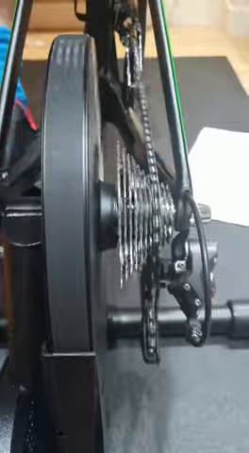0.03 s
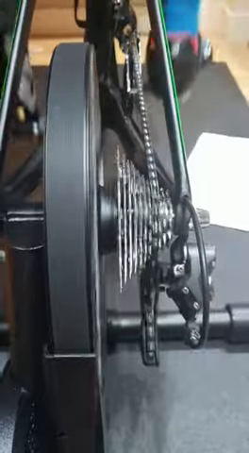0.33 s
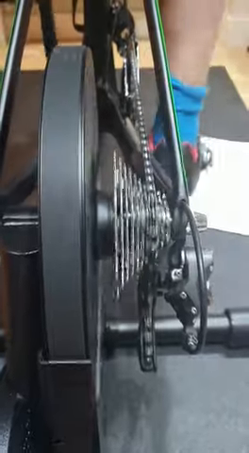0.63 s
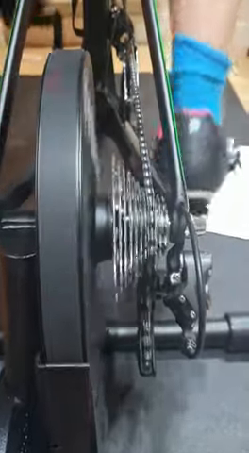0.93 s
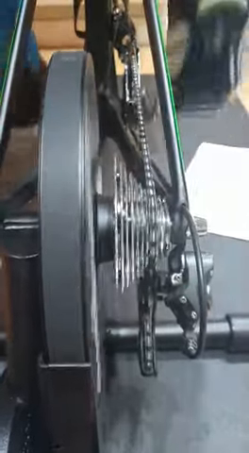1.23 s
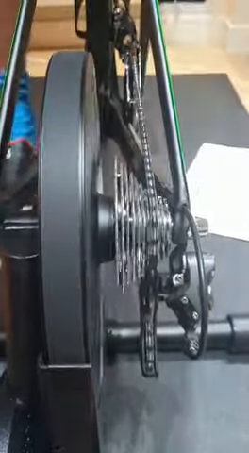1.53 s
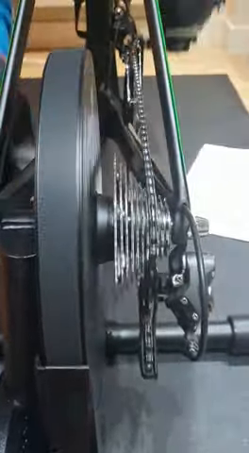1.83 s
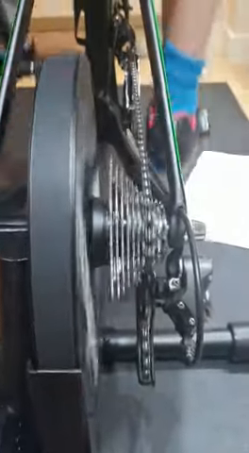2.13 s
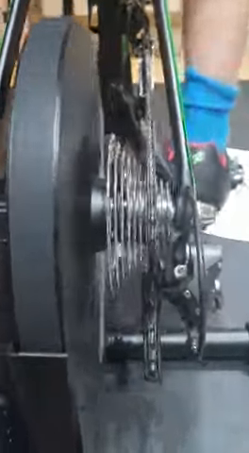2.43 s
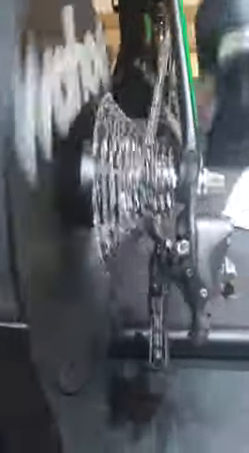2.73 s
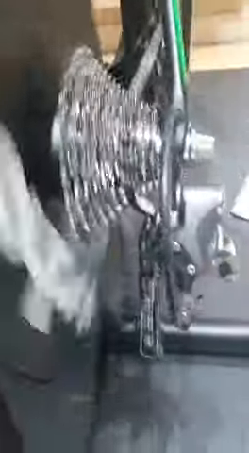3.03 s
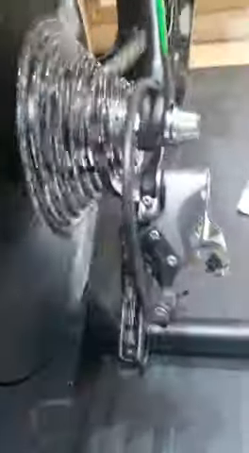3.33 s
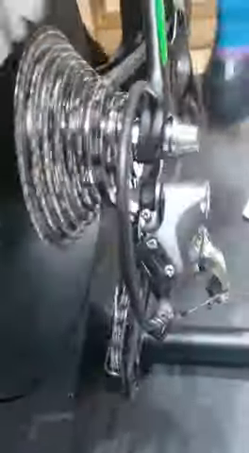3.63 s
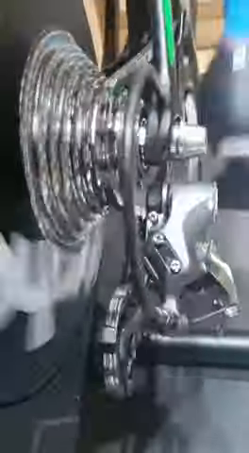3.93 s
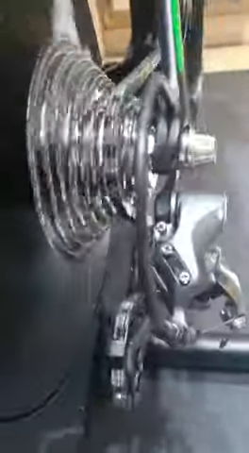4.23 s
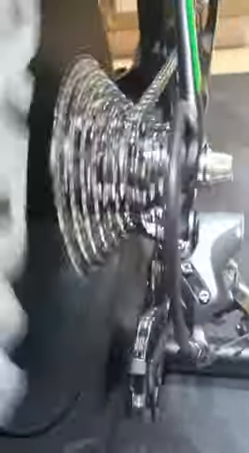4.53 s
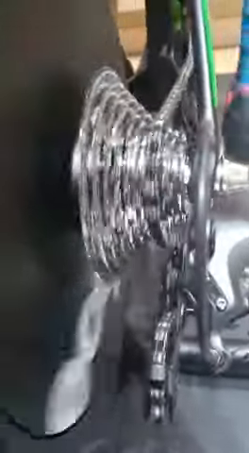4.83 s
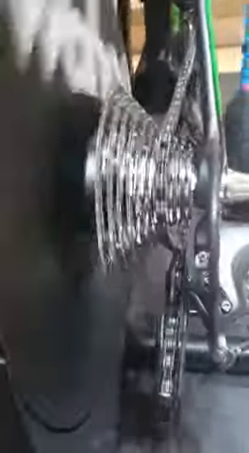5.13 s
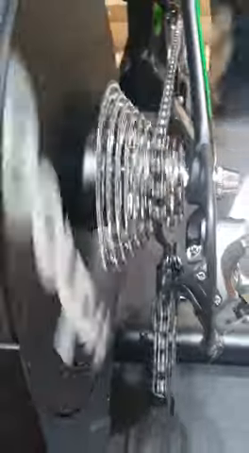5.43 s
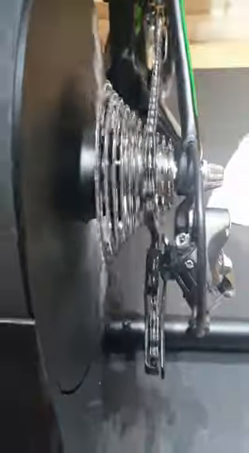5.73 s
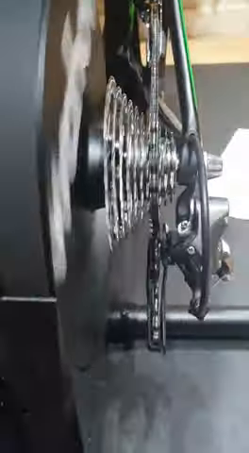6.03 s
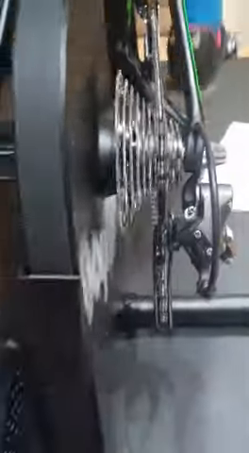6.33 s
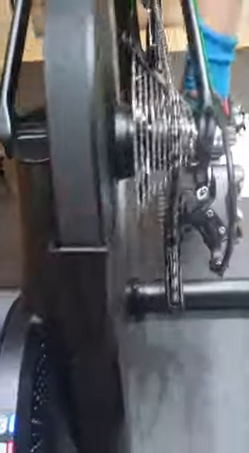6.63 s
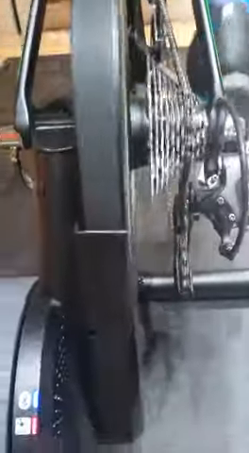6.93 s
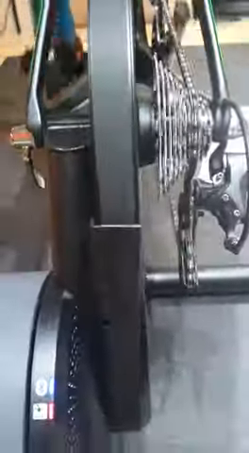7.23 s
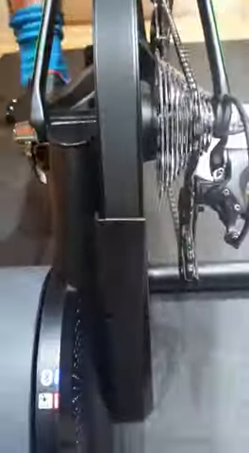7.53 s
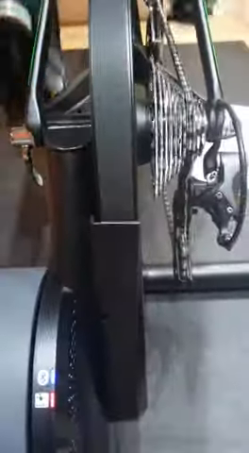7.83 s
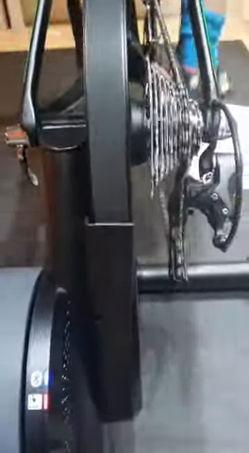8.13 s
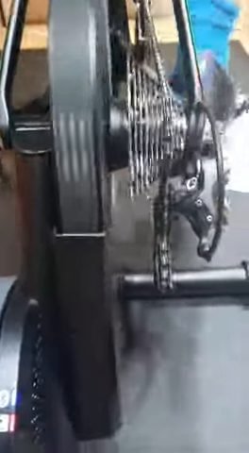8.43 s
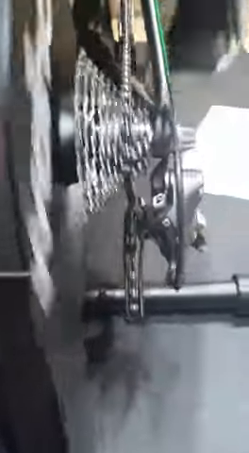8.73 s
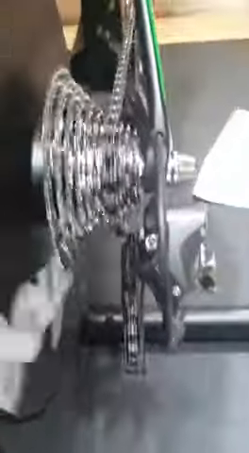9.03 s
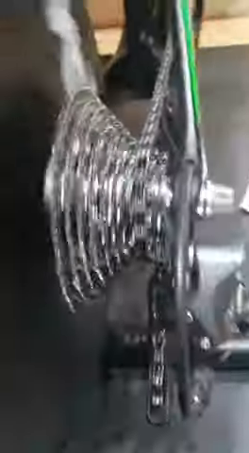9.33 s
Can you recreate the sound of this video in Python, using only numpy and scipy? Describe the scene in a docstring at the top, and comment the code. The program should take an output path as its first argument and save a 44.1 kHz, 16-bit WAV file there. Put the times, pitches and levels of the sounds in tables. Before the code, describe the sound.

A bicycle on an indoor trainer whirs and rumbles steadily, its chain rustling, with clicks and ringing clunks as the gears change.

```python
"""Changing gear on a bicycle trainer

A bicycle is pedalled on a direct-drive trainer in a small room, heard close to the cassette (the rear
sprockets). The flywheel drive whirs over a low rumble, the chain rustles and ticks, and each pedal
stroke rattles the frame. Gear changes make the chain click along the sprockets and drop onto them
with a clunk that rings in the room."""
import sys
import numpy as np
from scipy import signal
from scipy.fft import rfft, irfft, next_fast_len
from scipy.io import wavfile
from scipy.ndimage import map_coordinates

SR = 44100
rng = np.random.default_rng(int(sys.argv[2]) if len(sys.argv) > 2 else 0)


def to_wav(s):
    """Save 16-bit WAV."""
    ch = np.atleast_2d(s).T  # columns
    pcm = np.round(np.clip(ch, -1, 1) * 32767)  # PCM
    wavfile.write(sys.argv[1], SR, pcm.astype(np.int16))


N = 418068


def amp(db):
    """Turn decibels into a gain."""
    return 10 ** (np.asarray(db) / 20)


def unit(x):
    """Scale to an average power of 1."""
    return x / np.sqrt(np.mean(x ** 2) + 1e-20)


def along(points, hz):
    """Read between (frequency, value) points on a log axis."""
    f, v = np.transpose(points)
    return np.interp(np.log(hz + 1), np.log(f + 1), v)


def peaks(resonances, hz):
    """Gain of resonances given as (f/Hz, half-width/Hz, level/dB)."""
    gains = (amp(db) / (1 + ((hz - centre) / width) ** 2) for centre, width, db in resonances)
    return np.sqrt(sum(gain ** 2 for gain in gains))


def wobble(rate):
    """A smooth curve through `rate` random values a second."""
    return map_coordinates(rng.standard_normal(int(N * rate / SR) + 4), [np.arange(N) * rate / SR])


def add(track, s, sound):
    """Mix a stereo sound into the track at time s."""
    part = track[:, max(round(s * SR), 0):][:, :sound.shape[1]]
    part += sound[:, :part.shape[1]]


def colour(x, gain):
    """Filter by gain(hz), ringing only after a sound, never before it (minimum phase)."""
    n = x.shape[-1]
    m = 2 * next_fast_len(n // 2 + 4096)
    cepstrum = irfft(np.log(np.maximum(gain(np.fft.rfftfreq(m, 1 / SR)), 1e-6)))
    cepstrum[1:m // 2] *= 2
    cepstrum[m // 2 + 1:] = 0
    return irfft(rfft(x, m) * np.exp(rfft(cepstrum)), m)[..., :n]


def shaped(x, spectrum):
    """Filter by a spectrum without changing the power of white noise."""
    norm = np.sqrt(np.mean(amp(along(spectrum, np.linspace(0, SR / 2, SR // 10))) ** 2))
    return colour(x, lambda hz: amp(along(spectrum, hz)) / norm)


# how alike left and right sound: f/Hz, likeness (0 to 1)
LIKENESS = [(40, .65), (80, .75), (150, .93), (300, .5), (700, .25), (1500, .05), (5000, 0)]
def noise(size):
    """Stereo white noise: alike in the bass, unrelated in the treble."""
    m = next_fast_len(size)
    angle = np.arccos(np.clip(along(LIKENESS, np.fft.rfftfreq(m, 1 / SR)), -1, 1)) / 2
    mid, side = irfft(rfft(rng.standard_normal((2, m))) * [np.cos(angle), np.sin(angle)], m)
    return np.array([mid + side, mid - side])[:, :size]


def burst(t60):
    """A puff of noise with energy 1 that fades by 60 dB in t60 seconds."""
    t = np.arange(SR // 2) / SR
    return unit(noise(len(t)) * amp(-60 * t / t60)) / np.sqrt(len(t))


# how long the room rings: f/Hz, t60/s
ROOM_DECAY = [(80, 0.17), (400, 0.68), (1200, 0.59), (3000, 0.64), (6000, 0.49), (12000, 0.26)]
def room_tail():
    """The room's echo builds up quickly, then each frequency dies at its own speed."""
    size = SR // 2
    hz, t, spectra = signal.stft(noise(size), SR, nperseg=256)
    tail = signal.istft(spectra * amp(-60 * t / along(ROOM_DECAY, hz)[:, None]), SR)[1][:, :size]
    build_up = 1 - np.exp(-np.arange(size) / SR / 0.0027)
    return unit(tail * build_up) / np.sqrt(size)


def contact(t60, room_db):
    """One short tap followed by the room's echo."""
    return burst(t60) + amp(room_db) * room_tail()


def link_blows(rate_hz, scatter, spread_db):
    """Chain links hit teeth, uneven in time and strength."""
    slots = np.arange(int(N / SR * rate_hz))
    late, size = rng.standard_normal((len(slots), 2)).T
    at = np.clip((slots + scatter * late) / rate_hz * SR, 0, N - 1).astype(int)
    return np.bincount(at, amp(spread_db * np.clip(size, -2, 2)), N)


def struck(blows, answer):
    """Every blow sets off the same short sound."""
    return unit(signal.fftconvolve(blows[None], answer, axes=1)[:, :N])


# low drone of the stand and room: f/Hz, level/dB
HUM_TONES = [(62, -51), (90, -54), (100, -45), (113, -49)]
# tone of the shaking floor: f/Hz, level/dB
RUMBLE_SPECTRUM = [(15, -58), (25, -15), (35, -29), (44, -15), (54, 1.5), (70, -4.5), (102, 0.5), (114, -2),
                   (134, -6.5), (188, -9.5), (227, -21.5), (306, -19.5), (400, -31.5), (520, -47),
                   (880, -120)]
def stand(rumble_db):
    """The trainer shakes the floor, over a few slightly unsteady low tones."""
    t = np.arange(N) / SR
    hum = sum(amp(db) * np.sqrt(2) * np.sin(2 * np.pi * hz * t + .5 * wobble(2.48))
              for hz, db in HUM_TONES)
    return hum + amp(rumble_db - 4.0) * shaped(noise(N), RUMBLE_SPECTRUM)


# booms of the stand: t/s, relative level/dB, f/Hz, t60/s
STAND_JOLTS = [(2.531, -27, 93.5, 0.12), (2.986, -26.5, 192, 0.55), (3.042, -44, 188, .14),
               (3.346, -22, 90, 0.084), (3.82, -22.5, 82.5, 0.23), (3.864, -13, 114, 0.067),
               (3.932, -16, 98, 0.067), (4.899, -25, 81.6, 0.11), (5.135, -20, 183, 0.073),
               (6.1, -22, 108, 0.079), (8.06, -29, 180, 0.1), (9.265, -14.5, 83, 0.091)]
def thuds():
    """Each jolt rocks the stand in a soft, low, dying swing."""
    track, t = np.zeros((2, N)), np.arange(SR // 2) / SR
    onset = 1 - np.exp(-t / 0.0045)
    for s, db, hz, t60 in STAND_JOLTS:
        swing = amp(db + 1.0 - 60 * t / t60) * np.sin(2 * np.pi * hz * t) * onset
        add(track, s, np.array([swing, swing]))
    return track


# resonances of the flywheel drive: f/Hz, half-width/Hz, level/dB
WHIR_PEAKS = [(1337, 78, -7.5), (1389.6, 13, -1.5), (1418, 9.4, -1), (1456.4, 31, -1), (1544, 29, -14)]
def flywheel(whir_db):
    """The belt rubs a tight cluster of resonances; uneven tension makes the whir swell and flutter."""
    whir = unit(colour(noise(N), lambda hz: peaks(WHIR_PEAKS, hz)))
    return amp(whir_db - 0.9 + 0.35 * wobble(7.8) + 0.85 * wobble(60)) * whir


# the frame knocks under load: t/s, relative level/dB, swell of the chatter around it/dB
FRAME_KNOCKS = [(0.33, -33.5, 1), (0.998, -30, 1.5), (1.102, -33, 6.5), (1.394, -38.5, 1.5),
                (1.859, -35, 1.5), (2.028, -33.5, 5), (2.101, -33, 1), (2.949, -27, 4), (3.054, -29, 5.5),
                (3.355, -29.5, 3), (3.456, -27.5, -3.5), (4.104, -30.5, 1), (4.401, -31, -4.5),
                (5.14, -23, 7), (5.571, -33, 4), (6.115, -35, 0.5), (6.325, -35, 6), (6.989, -30, 3),
                (7.221, -30, 5.5), (7.929, -33.5, 7.5), (8.057, -23.5, 0), (8.56, -35, 7),
                (8.758, -26, 5.5), (9.005, -25.5, 4)]
# tone of the chatter and of a knock: f/Hz, level/dB
RATTLE_SPECTRUM = [(120, -27), (200, 1.5), (240, -3.5), (310, 3), (400, -8.5), (495, 4.5), (570, -2),
                   (700, -3), (800, -2), (1040, -1), (1200, -6), (1800, -8), (3500, -20), (8000, -56)]
KNOCK_SPECTRUM = [(40, -3.5), (100, 8.5), (190, 2.5), (240, -4.5), (310, -2), (400, -2.5), (800, -3),
                  (1100, -5), (2000, -17), (4000, -17.5), (12000, -49)]
def frame(rattle_db):
    """Pedal strokes make the frame chatter, with a dull knock where the load peaks."""
    chatter = struck(link_blows(rate_hz=60, scatter=.35, spread_db=4.5), contact(0.028, room_db=-1.5))
    knocks = np.zeros((2, N))
    for s, db, _ in FRAME_KNOCKS:
        add(knocks, s, amp(db + 24.5) * contact(t60=0.087, room_db=-5))
    rattle = amp(rattle_db - 1.0) * shaped(unit(noise(N) + 0.86 * chatter), RATTLE_SPECTRUM)
    return rattle + shaped(knocks, KNOCK_SPECTRUM)


# tone of the rollers and of the links: f/Hz, level/dB
RUSTLE_SPECTRUM = [(1000, -27), (1700, 1), (2300, -4.5), (2640, 4), (3100, 3), (4070, -3.5), (4550, -5),
                   (5090, -6), (6700, -11.5), (7630, -22), (10300, -18), (16000, -28.5)]
TICK_SPECTRUM = [(2500, -37), (5000, -7), (7600, -11), (9000, -3), (10100, 2), (11000, -3), (13000, -5),
                 (16000, -17)]
# the sprockets sing under the chain: f/Hz, half-width/Hz, level/dB
SINGING_PEAKS = [(2159, 20, 13), (3870, 22, -25)]
def chain(rustle_db, ring_db, tick_db):
    """Rollers rustle through the gear changer and keep the sprockets singing; links tick brightly."""
    rollers = struck(link_blows(rate_hz=88, scatter=.15, spread_db=8.5), contact(0.014, room_db=0.5))
    rustle = amp(rustle_db - .5) * shaped(unit(noise(N) + 0.64 * rollers), RUSTLE_SPECTRUM)
    ring_gain = amp(ring_db + 0.5 + 1.9 * wobble(8.8))
    ring = ring_gain * unit(colour(noise(N), lambda hz: peaks(SINGING_PEAKS, hz)))
    links = struck(link_blows(rate_hz=30, scatter=.08, spread_db=4.0), contact(0.021, room_db=-1.5))
    return rustle + ring + amp(tick_db + 0.4) * shaped(links, TICK_SPECTRUM)


# when the gear changer moves: start/s, end/s
SHIFT_TIMES = [(2.92, 5.3), (8.93, 10)]
def grazes(per_s=14, clack_db=-47, snap_db=-48.5, spread_db=2, clink_hz=3080):
    """Chain plates brush the teeth lightly during a shift; gives extra rows for clicks()."""
    late, clack, snap, pitch = np.clip(rng.standard_normal((200, 4)), -2, 2).T
    s = (np.arange(len(late)) + .3 * late) / per_s
    rows = np.column_stack([s, clack_db + spread_db * clack, snap_db + spread_db * snap,
                            clink_hz * np.exp(.15 * pitch)])
    return [row for row in rows if any(start < row[0] < end for start, end in SHIFT_TIMES)]


# chain plates catch on teeth: t/s, relative clack level/dB, relative snap level/dB, clink f/Hz
CHAIN_CATCHES = [(2.959, -29, -46, 2360), (2.981, -29, -42, 2350), (3.046, -28, -39, 3670),
                 (3.114, -29.5, -39, 2310), (3.244, -35, -47, 3680), (3.338, -32, -35, 5940),
                 (3.432, -38, -41, 3300), (3.456, -34.5, -37, 3600), (3.625, -34.5, -40, 3600),
                 (3.727, -35, -43, 3790), (3.797, -32.5, -37, 3650), (3.865, -30.5, -26, 3790),
                 (3.931, -36, -40, 3620), (4.187, -37, -41, 2730), (4.376, -35.5, -35.5, 3620),
                 (4.402, -38.5, -47, 3600), (4.577, -34.5, -50, 3040), (4.666, -38, -44, 3790),
                 (4.862, -35.5, -36, 2930), (4.897, -41, -31, 3900), (5.119, -31, -40.5, 2410),
                 (5.289, -43, -46, 2410), (5.836, -39.5, -46.5, 3450), (7.247, -38, -49, 3450),
                 (8.759, -31, -53, 3140), (8.959, -32.5, -56, 3850), (8.976, -34, -35, 3600),
                 (9.006, -29.5, -32.5, 3520), (9.138, -50, -39.5, 3450), (9.245, -32, -19, 4020)]
# tone of a clack and of a snap: f/Hz, level/dB
CLACK_SPECTRUM = [(200, -28), (800, 2), (2200, 2), (3800, 0.5), (6500, -8), (9000, -18.5), (16000, -47)]
SNAP_SPECTRUM = [(2000, -53), (6000, 2), (7600, -0.5), (10000, 10), (13000, 3), (16000, -5)]
def clicks():
    """The shifting chain catches on teeth: its guide cage clacks and the plate snaps brightly."""
    clacks, snaps = np.zeros((2, 2, N))
    for s, clack_db, snap_db, clink_hz in CHAIN_CATCHES + grazes():
        room = room_tail()
        tap = burst(t60=0.038) + amp(-3.5) * room
        clack = colour(tap, lambda hz: np.hypot(1, peaks([(clink_hz, 250, 3)], hz)))
        add(clacks, s, amp(clack_db + 27.0) * clack)
        add(snaps, s, amp(snap_db + 26.5) * (burst(t60=0.017) + amp(-7) * room))
    return shaped(clacks, CLACK_SPECTRUM) + shaped(snaps, SNAP_SPECTRUM)


# lasting tones of the cassette: f/Hz, level/dB, t60/s
STEEL_TONES = [(553, 3.5, 0.53), (750, 3, 0.35), (996, 1, 0.52), (1250, 0, 0.4), (1470, 6, 0.34),
               (1550, -2, 0.41), (1695, -1, 0.41), (1814, -3, .4), (2349, 0, 0.6), (2400, -1, 0.49),
               (2640, 2, 0.52), (2870, -3, 0.65), (3130, -2, 0.27), (3980, 10, 0.23), (5352, 3, 0.3),
               (6007, -9, 0.35), (8463, 4, 0.42), (9450, -1, 0.28)]
def cassette_ring():
    """Struck steel rings, each tone at a new strength for every blow and channel."""
    t = np.arange(SR // 2) / SR
    ring = sum(amp(db + rng.standard_normal((2, 1)) - 60 * t / t60)
               * np.sin(2 * np.pi * (hz * t + rng.random((2, 1)))) for hz, db, t60 in STEEL_TONES)
    return unit(ring) / np.sqrt(len(t))


# the chain lands: t/s, six relative band levels/dB, three ring pitches f/Hz, crack/dB, room/dB, steel/dB
CHAIN_DROPS = [(2.7275, -38, -26, -30.5, -25, -27.5, -32, 690, 850, 4540, 1, -0.34, -19),
               (2.771, -28.5, -29.5, -24, -24.5, -30, -26, 804, 1900, 3800, 2.5, -1.5, -22),
               (3.8137, -38, -30, -35.5, -21.5, -22.5, -18, 900, 3500, 6150, 2, -2.2, -16),
               (4.895, -45, -39.5, -43, -34, -34.5, -35, 845, 3680, 11100, 4.5, 1.9, -14),
               (5.134, -29.5, -20.5, -20.5, -23.5, -35.5, -34.5, 1310, 2300, 5200, 4, -2.1, -14.5),
               (8.057, -25, -33.5, -29.5, -29.5, -31, -31.5, 680, 2600, 8900, -5.5, 1.5, -15.5),
               (8.27, -30.5, -34, -28, -27, -22.5, -25.5, 740, 1820, 6070, 0, 1.7, -12.5),
               (9.2432, -37, -27.5, -22.5, -18, -26.5, -25, 1535, 2800, 5300, -2.5, 0.1, -11.5)]
# those six bands: low f/Hz, high f/Hz
DROP_BANDS = [(50, 220), (450, 1100), (1100, 1900), (1900, 3500), (3500, 7000), (7000, 15000)]
# tone shared by all the clunks: f/Hz, level/dB
CLUNK_SPECTRUM = [(25, -29), (55, 2), (90, -0.5), (190, 7.5), (270, -10.5), (400, -5), (530, -0.5),
                  (2500, 1), (6000, 1.5), (7400, -6), (9500, -2), (13000, -8.5), (16000, -16)]
def clunks():
    """The taut chain drops onto a sprocket: a crack, a shudder of the frame, ringing steel, an echo."""
    track = np.zeros((2, N))
    low, high = np.transpose(DROP_BANDS)
    width_db = 10 * np.log10((high - low) / (SR / 2))
    seating = 1 - np.exp(-np.arange(SR // 2) / SR / 0.0015)  # the rollers take a moment to bite
    for s, *band_db, low_hz, mid_hz, high_hz, crack_db, room_db, steel_db in CHAIN_DROPS:
        spectrum = np.column_stack([np.sqrt(low * high), band_db - width_db])
        contacts = seating * (amp(crack_db + .5) * burst(t60=0.025) + amp(-5.5) * burst(t60=0.063))
        blow = contacts + amp(room_db - 2.5) * room_tail() + amp(steel_db) * cassette_ring()
        sprocket = [(low_hz, 90, 4), (mid_hz, 150, 4), (high_hz, 260, 7)]  # its own resonances
        clunk = colour(blow, lambda hz: amp(along(spectrum, hz) + along(CLUNK_SPECTRUM, hz) + 28)
                       * np.hypot(1, peaks(sprocket, hz)))
        add(track, s, clunk)
    return track


# resonances of frame and sprockets: f/Hz, half-width/Hz, level/dB
BODY_PEAKS = [(588, 38, 0), (796, 97, 3), (1007, 18, 2), (1883, 20, -0.5), (2360, 140, 0.5), (2840, 45, -4),
              (3140, 120, 2), (3438, 63, 3.5), (3770, 24, 5), (4160, 60, 2.5), (4850, 57, -4),
              (5150, 37, -9.5), (8400, 72, -6.5), (9600, 86, -12)]
def through_body(x):
    """The bicycle's own resonances colour every contact."""
    return colour(x, lambda hz: np.hypot(1, peaks(BODY_PEAKS, hz)) * amp(-2))


# how near the microphone is to the cassette: t/s, nearness/dB
NEARNESS = [(0.12, -0.5), (2.1, 0.5), (2.38, 3), (2.64, 2), (3.0, 8), (3.5, 6), (4.0, 8), (4.3, 4.7),
            (5.1, 5), (5.45, 1.4), (5.8, 2.3), (6.1, 0), (6.8, 0.7), (7.55, 1.5), (7.9, 2), (8.7, 2),
            (9.1, 7.5), (9.45, 3)]
# for each part of the drive: relative level from afar/dB, dB gained per dB of nearness
PART_LEVELS = {"whir": (-43, 0.9), "rumble": (-40, 0.58), "ring": (-61.5, 2), "rustle": (-47.5, 0.39),
               "ticks": (-63.5, 1.03), "rattle": (-50, 0.53)}
def scene():
    """The running drive, louder as the microphone comes near, with the gear changes on top."""
    t = np.arange(N) / SR
    near_db = np.interp(t, *np.transpose(NEARNESS))
    db = {part: far_db + growth * near_db for part, (far_db, growth) in PART_LEVELS.items()}
    swell_s, swell_in_rumble = 0.099, 0.52  # half length of a swell; share that shakes the stand
    swell_db = sum(size_db * np.exp(-((t - s) / swell_s) ** 2) for s, _, size_db in FRAME_KNOCKS)
    turn_s, peak_s = .472, 0.47  # the links tick hardest once in every turn of the cassette
    turn_db = 3.5 * np.cos(2 * np.pi * (t - peak_s) / turn_s)
    pedalling = chain(db["rustle"], db["ring"], db["ticks"] + turn_db) + frame(db["rattle"] + swell_db)
    bicycle = through_body(pedalling + clicks() + clunks())
    return stand(db["rumble"] + swell_in_rumble * swell_db) + thuds() + flywheel(db["whir"]) + bicycle


# how much louder the right side is than the left: f/Hz, level/dB
RIGHT_OVER_LEFT = [(100, 1), (330, 3), (550, 0), (1100, 4), (1400, 1), (2000, 1), (3200, 5.5), (4800, -3),
                   (6500, -5.5), (7800, -17.5), (10200, -1), (13000, -11.5), (16000, -21)]
def record(dry):
    """A phone's two microphones differ in tone, open after a moment and lose the highest treble."""
    start_s, top_hz = .072, 16100
    left = colour(dry[0], lambda hz: np.sqrt(2 / (1 + amp(along(RIGHT_OVER_LEFT, hz)) ** 2)))
    right = colour(dry[1], lambda hz: np.sqrt(2 / (1 + amp(-along(RIGHT_OVER_LEFT, hz)) ** 2)))
    pair = np.array([left, right]) * amp(0.5) * (np.arange(N) / SR > start_s)
    m = next_fast_len(N + SR // 2)
    return irfft(rfft(pair, m) * (np.fft.rfftfreq(m, 1 / SR) < top_hz), m)[:, :N]


dry = scene()
out = record(dry)
to_wav(out)
```